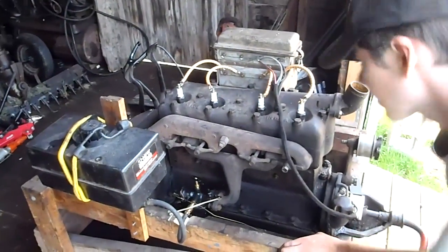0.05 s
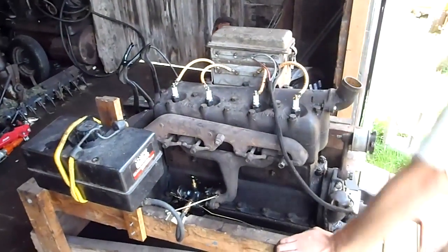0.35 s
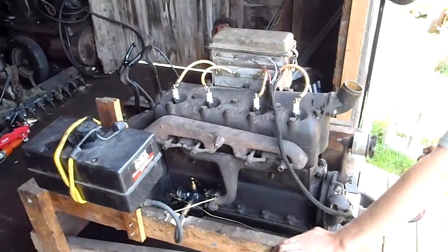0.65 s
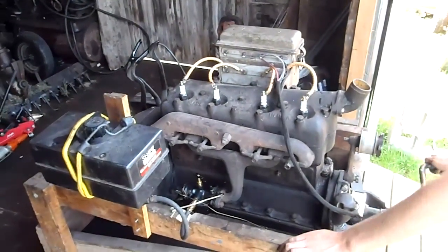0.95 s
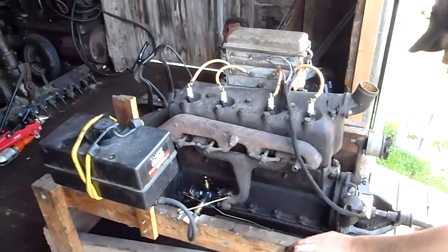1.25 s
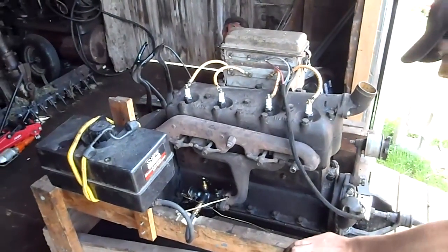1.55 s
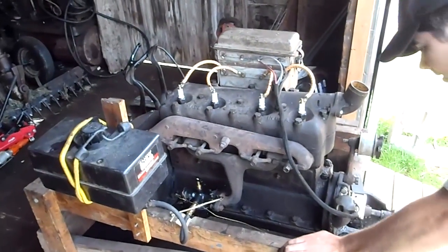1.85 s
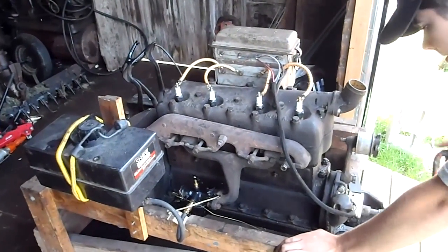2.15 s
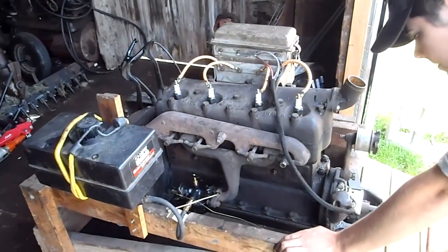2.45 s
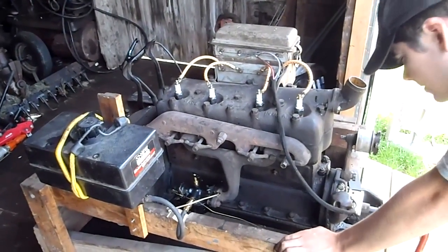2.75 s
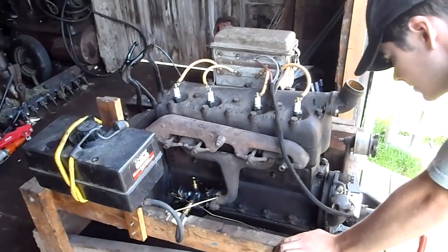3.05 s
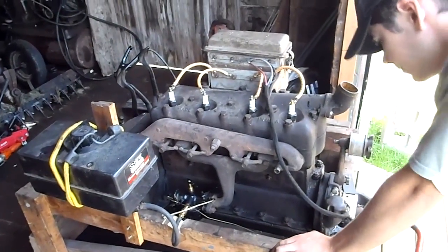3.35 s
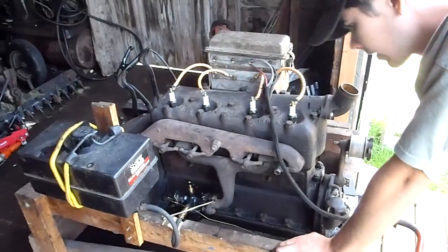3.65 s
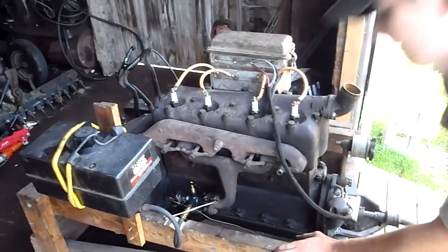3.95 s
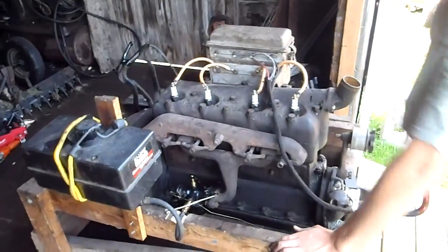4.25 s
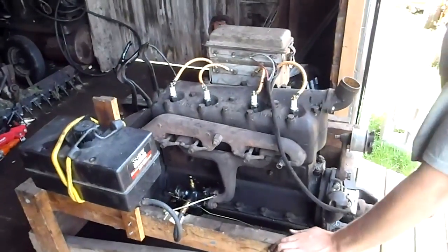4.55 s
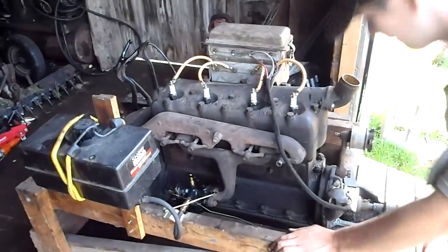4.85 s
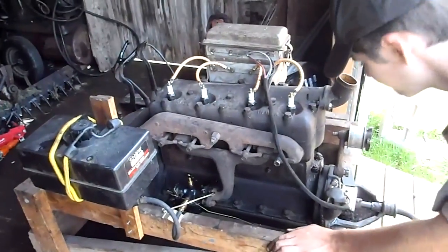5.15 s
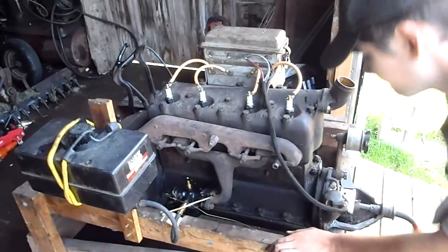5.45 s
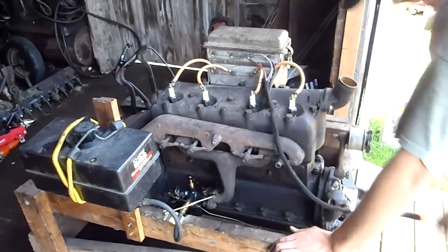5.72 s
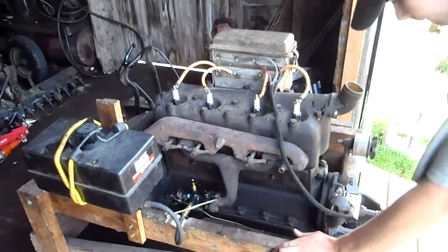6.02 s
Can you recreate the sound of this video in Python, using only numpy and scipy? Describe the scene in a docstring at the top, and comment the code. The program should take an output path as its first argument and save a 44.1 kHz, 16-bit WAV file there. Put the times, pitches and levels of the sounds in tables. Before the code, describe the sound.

An old engine is turned over by hand in a wooden shed and never starts. The steel crank clanks while ignition coils buzz, pistons scrape and squeezed air hisses out. A quieter stretch brings a few ratchet clicks and soft wooden thumps. Then a louder attempt follows, with longer buzzing, sharp ringing knocks and a brief squeak. The sounds are close, with a short echo over soft outdoor air.

```python
"""An old four-cylinder engine is cranked by hand in a wooden shed and does not start.
The steel crank clanks in its ratchet, sets the iron block and the handle ringing, and briefly squeaks.
Ignition coils buzz and spit sparks whenever the timer, a turning switch, connects one of them.
Pistons scrape, squeezed air hisses and whistles out, and the engine thumps on its timber stand.
The plank walls echo, and a soft rush of outdoor air comes in through the door."""
import sys
import numpy as np
from scipy import signal
from scipy.fft import rfft, irfft, next_fast_len
from scipy.io import wavfile

SR = 44100
rng = np.random.default_rng(int(sys.argv[2]) if len(sys.argv) > 2 else 0)


def transcribe(u):
    """Save the signal u as a 16-bit wav file named by the first command-line argument.

    u: samples, shape (n,) or (channels, n), limited to [-1, 1]; the rate is SR.
    q: integer samples, one column per channel.
    """
    v = np.clip(np.atleast_2d(u).T, -1, 1)
    q = np.round(v * 32767).astype(np.int16)
    wavfile.write(sys.argv[1], SR, q)


N = 272626
TIME = np.arange(N) / SR


def from_db(db):
    """Turn decibels into a factor to multiply a sound by."""
    return 10 ** (np.asarray(db) / 20)


def rms_one(x):
    """Scale a signal so that its average strength (rms) is 1."""
    return x / np.sqrt(np.mean(x ** 2) + 1e-20)


def fade(t, ring_s):
    """A dying away that loses 60 dB every ring_s seconds."""
    return from_db(-60 * t / ring_s)


def at_hz(points, hz):
    """Read a table between its rows, giving each octave equal room."""
    freqs, values = np.transpose(points)
    return np.interp(np.log(np.maximum(hz, 1)), np.log(freqs), values)


def coloured(x, spectrum, peaks=()):
    """Give a sound a broad tone colour with ringing peaks on top, at strength 1."""
    size = next_fast_len(len(x))
    hz = np.arange(size // 2 + 1) * SR / size
    gain = from_db(at_hz(spectrum, hz))
    for centre, width, lift_db in peaks:
        gain = gain * (1 + (from_db(lift_db) - 1) / (1 + 2j * (hz - centre) / width))
    return rms_one(irfft(rfft(x, size) * gain, size)[:len(x)])


def band(x, edges_hz, kind, order=2):
    """Keep one range of frequencies."""
    return signal.sosfilt(signal.butter(order, edges_hz, kind, fs=SR, output="sos"), x)


def drift(rate_hz):
    """A random wander of strength 1 that turns rate_hz times a second."""
    points = rng.standard_normal(4000)
    return rms_one(np.interp(TIME * rate_hz, np.arange(len(points)), points))


def surge(top_s, db, rise_s, fall_s):
    """A level that builds smoothly to its top, then dies away."""
    before, after = np.maximum(top_s - TIME, 0), np.maximum(TIME - top_s, 0)
    return from_db(db) * np.exp(-(before / rise_s) ** 2 - after / fall_s)


def add(track, start_s, sound):
    """Mix a sound into a track at the given time."""
    start = max(round(start_s * SR), 0)
    track[start:start + len(sound)] += sound[:N - start]


# tone colour of the air outside: frequency_hz, gain_db
AIR_COLOUR = [(15, -48), (25, -16.5), (168, -6), (344, -4.5), (392, -15), (525, -4), (632, -1.5), (703, -1),
              (761, 1), (868, -3), (1870, -9), (2310, -8.5), (14000, -14)]
def outdoor_air(level_db=-51):
    """A steady, soft rush comes through the open door."""
    return from_db(level_db) * coloured(rng.standard_normal(N), AIR_COLOUR)


# a piston comes up and squeezes the air: top_s, hiss_db, push_s
PISTON_STROKES = [(.35, -46, 0.043), (.55, -36.5, 0.13), (.885, -53, .035), (1.33, -46.5, 0.16),
                  (2.1, -55, 0.069), (2.8, -53.5, .15), (3.38, -56, 0.14), (3.68, -61, 0.066),
                  (3.929, -50, 0.048), (4.311, -31, 0.096), (5.29, -45, 0.11), (5.69, -32, 0.032),
                  (5.95, -41, 0.12)]
# tone colours of the scraping and of the escaping air: frequency_hz, gain_db
DRAG_COLOUR = [(60, -27.5), (150, -9), (280, 0), (480, 2), (700, -4.5), (1100, -3.5), (2000, -3.5),
               (4000, -16)]
LEAK_COLOUR = [(300, -12.5), (1500, -4.5), (3000, -3), (4300, 2), (5300, 4), (6300, 0.5), (8000, -13.5),
               (14000, -22)]
# a faint ringing in the escaping air: pitch_hz, width_hz, lift_db
LEAK_PEAK = [(5080, 100, 0.95)]
def cylinders(rest_hiss_db=-57, rest_drag_db=-53.5, drag_follows=0.22, grit_db=2):
    """Pistons scrape along and push air past their sealing rings; both sounds grow with pressure."""
    scrape = coloured(rng.standard_normal(N) * from_db(grit_db * drift(60)), DRAG_COLOUR)
    hiss = coloured(rng.standard_normal(N), LEAK_COLOUR, LEAK_PEAK)
    squeezes = sum(surge(top_s, db, push_s, fall_s=0.11) for top_s, db, push_s in PISTON_STROKES)
    pressure = from_db(rest_hiss_db) + squeezes
    drag = from_db(rest_drag_db) * (pressure / from_db(rest_hiss_db)) ** drag_follows
    return drag * scrape + pressure * hiss


# notes of the cast-iron block: pitch_hz, relative_db, ring_s
BLOCK_NOTES = [(208.7, -24.5, 0.36), (322.5, -29, 0.6), (488, -23, 0.083), (579.5, -21, 0.25),
               (666, -12.5, 0.54), (707, -15, 0.25), (1151, -17.5, 0.16)]
def knock(notes, crack_colour, thud_db, clank_db, click_db, crack_db=4, crack_s=0.058):
    """Steel hits steel: a noisy crack and ringing notes make a low thud, a clank and a high click."""
    t = np.arange(SR * 3 // 4) / SR
    ring = from_db(crack_db) * fade(t, crack_s) * coloured(rng.standard_normal(len(t)), crack_colour)
    for hz, db, ring_s in notes + list(BLOCK_NOTES):
        strength = from_db(db + 3 * rng.standard_normal()) * rng.choice([-1, 1])
        shifted_hz = hz * (1 + 0.0061 * rng.standard_normal())   # the hand's push bends each note
        ring += strength * fade(t, ring_s) * np.sin(2 * np.pi * shifted_hz * t)
    get_moving = 1 - np.exp(-t / 0.00053)   # the heavy block needs a moment
    thud = band(ring, [170, 1200], "band", order=3) * get_moving
    clank = band(ring, [1400, 3300], "band", order=3)
    click = band(ring, 3300, "high", order=3)
    parts = (thud_db, thud), (clank_db, clank), (click_db, click)
    return sum(from_db(db) * part / np.std(part[t < .01]) for db, part in parts)


# notes of the steel crank and ratchet: pitch_hz, in_knock_db, in_slip_db, ring_s
CRANK_NOTES = [(476, -3, -5, .08), (560, -11, -6, .12), (780, -6, -13, .04), (960, -9, -9, .04),
               (1270, -12, -20, .04), (1640, -4, -9, .06), (1707, -11, -12, .12), (1865, -9, 4, .06),
               (1968, -20, -12, .13), (2920, -15, -9, .04), (3230, -11, -6, .04), (3590, -13, -5, .06),
               (4200, -11, -5, .04), (4860, -14, 0, .07), (5040, -16, -8, .11), (5260, 1, -11, .035),
               (6200, -8, -10, .05), (7100, -17, -14, .025), (2500, -15, 2, .028)]
# the crank's pin knocks in its seat: start_s, relative_db, hardness_db
PIN_KNOCKS = [(0.2886, -29.5, -9.5), (0.3487, -17.5, 1.5), (0.4617, -25.5, -5), (0.5483, -23, -16),
              (0.5886, -26.5, -30), (0.606, -19, 1), (0.6988, -32.5, -1), (0.9828, -33.5, 8.5),
              (1.041, -32, -2.5), (1.2131, -33, -12), (1.503, -40, -9), (1.6814, -43, -15),
              (2.2775, -33, -11), (3.1103, -29, -20), (3.25, -37, -16), (3.9947, -30, -12),
              (4.0541, -27, -6), (4.0795, -14, 0.5), (4.1405, -25, 2), (4.2115, -23, -2.5),
              (4.4199, -31, -21), (4.4608, -27, -2), (4.6019, -25.5, 7.5), (4.6292, -14.5, -2.5),
              (4.6459, -19.5, 3), (4.9714, -21, -7), (5.0409, -11, -2), (5.0484, -24.5, 8),
              (5.1472, -21, 3), (5.251, -19.5, -20), (5.2691, -20.5, 5), (5.654, -13.5, 1),
              (5.8297, -28, -5), (5.8673, -22.5, 1), (6.0629, -20, -3.5)]
# the pin rides over a ratchet tooth and drops: start_s, clank_db, thud_db, click_db
PIN_SLIPS = [(2.052, -43, -50, -45.5), (2.207, -41.5, -41, -41.5), (2.455, -23.5, -38.5, -28),
             (2.471, -31.5, -43, -35.5), (2.6899, -16, -46, -19), (2.7008, -22, -30.5, -27.5)]
# tone colours of the crack in a knock and in a slip: frequency_hz, gain_db
KNOCK_COLOUR = [(100, -2), (250, -33), (480, -3.5), (850, 18.5), (1150, 11), (1650, 7.5), (2200, 9),
                (3200, 7), (4400, 6.5), (5300, 11), (7500, 0.5), (8800, -10.5), (15000, -41)]
SLIP_COLOUR = [(150, -8), (520, 1), (900, 4.5), (1350, -2), (1850, -3), (2150, -6), (2500, 11), (3200, -8),
               (4900, 2), (5600, -9), (7700, -8), (8800, -35), (15000, -22)]
def crank(bounce_s=0.016, bounce_db=-17.5):
    """The pin knocks and bounces once, or slips off a tooth. Harder knocks click more and thud less."""
    knock_notes = [(hz, db, ring_s) for hz, db, _, ring_s in CRANK_NOTES]
    slip_notes = [(hz, db, ring_s) for hz, _, db, ring_s in CRANK_NOTES]
    out = np.zeros(N)
    for start_s, db, hardness_db in PIN_KNOCKS:
        thud_db = -41 + 0.78 * (db + 25) - 0.41 * hardness_db   # -25 is a middling knock
        levels_db = thud_db - 3, db - 9, db + hardness_db - 7   # thud, clank, click
        add(out, start_s, knock(knock_notes, KNOCK_COLOUR, *levels_db))
        again_s = start_s + bounce_s * rng.uniform(0.87, 1.2)
        add(out, again_s, from_db(bounce_db) * knock(knock_notes, KNOCK_COLOUR, *levels_db))
    for start_s, clank_db, thud_db, click_db in PIN_SLIPS:
        slip = knock(slip_notes, SLIP_COLOUR, thud_db, clank_db, click_db, crack_db=8, crack_s=0.038)
        add(out, start_s, slip)
    return out


# the timer connects a coil: start_s, length_s, level_db, midway_change_db, coil_name
TIMER_CONTACTS = [(0.33, 0.0086, -35, 3, "A"), (0.387, 0.2, -33.5, 9, "A"), (0.977, 0.017, -32.5, -2, "A"),
                  (1.067, 0.35, -33, 1.5, "B"), (3.858, 0.032, -33.5, 2, "A"),
                  (4.097, 0.07, -37.5, 5.5, "A"), (4.248, 1.445, -30, -0.5, "C"),
                  (5.859, .19, -29.5, 0, "B"), (5.905, 0.11, -30, 1.5, "A"), (6.124, 0.078, -27, -3.5, "B")]
def timer(name, attack_s=0.005, release_s=0.0026):
    """One coil's loudness: on as the switch closes, swelling or dipping midway, off as it opens."""
    gain = np.zeros(N)
    for start_s, length_s, db, change_db, coil_name in TIMER_CONTACTS:
        if coil_name == name:
            t = TIME - start_s
            arch = np.sin(np.pi * np.clip(t / length_s, 0, 1))
            attack = np.clip(t / attack_s, 0, 1)
            release = np.exp(-np.maximum(t - length_s, 0) / release_s)
            gain += from_db(db + change_db * arch) * attack * release
    return gain


# tone colour of the sparks: frequency_hz, gain_db
SPARK_COLOUR = [(80, -41), (300, -25), (700, -18), (1800, -13), (2800, -12.5), (3800, -1.5), (5200, 1.5),
                (6200, 1.5), (7300, -6), (8800, -14), (11500, -11.5), (14000, -13.5)]
# ringing of each coil's steel spring and case: pitch_hz, width_hz, lift_db
COIL_A_PEAKS = [(705, 150, 16.5), (2490, 510, 12.5), (3750, 120, 0.5), (4040, 72, 10.5), (5130, 420, 7),
                (5680, 120, 2.5), (10600, 710, -1)]
COIL_B_PEAKS = [(45, 48, 24.4), (674, 130, 1.6), (1094, 40, 14.3), (2280, 150, 10.3), (3620, 49, 12.6),
                (4930, 170, 1.5), (5390, 930, 6.8), (7380, 300, 7.9), (8540, 140, 11.5), (11100, 70, 13.3)]
COIL_C_PEAKS = [(1093, 40, 9.9), (2430, 190, 10.1), (4300, 70, 8.2), (5840, 72, 9.3), (6370, 40, 7.6),
                (6206, 80, 5.6), (10680, 210, 9.4), (11270, 187, 13), (13500, 1400, 1.6)]
def coil(peaks, buzz_hz, jitter=0.1, spark_s=0.0012, sizzle=0.96, uneven_db=2.2, flutter_db=1.2):
    """A trembling spring keeps breaking the current; each break sparks and rings spring and case."""
    cycles = np.cumsum(buzz_hz * np.exp(jitter * drift(150))) / SR
    strength = from_db(uneven_db * rng.standard_normal(N))[cycles.astype(int)]
    since_break_s = (cycles % 1) / buzz_hz
    sparks = strength * np.exp(-since_break_s / spark_s) + sizzle
    buzz = sparks * from_db(flutter_db * drift(90)) * rng.standard_normal(N)
    # the coil's box adds many short-lived notes
    t = np.arange(SR // 16) / SR
    box = rng.standard_normal(len(t)) * fade(t, ring_s=0.086)
    box_ring = from_db(-7) * signal.fftconvolve(buzz, box / np.linalg.norm(box))[:N]
    return coloured(buzz + box_ring, SPARK_COLOUR, peaks)


# the engine rocks its stand: start_s, level_db, pitch_hz
STAND_THUMPS = [(0.342, -40, 200), (.59, -40, 590), (.618, -35, 583), (.635, -42, 290), (1.041, -42.5, 328),
                (1.051, -49, 195), (1.271, -42, 420), (2.069, -42, 465), (2.304, -45, 486),
                (2.715, -36, 570), (3.112, -38, 490), (3.266, -41, 280), (4.647, -33.5, 640),
                (5.048, -27, 485), (5.153, -38, 380), (5.272, -37.5, 360), (5.976, -39.5, 312),
                (6.064, -36, 610)]
# tone colour of the timber: frequency_hz, gain_db
TIMBER_COLOUR = [(70, -58), (150, -7.5), (290, 0.5), (500, 2.5), (800, 8), (1500, -3.5), (4000, -26)]
def stand(rise_s=0.0011, ring_s=0.1, width_hz=50, lift_db=15):
    """Wood thumps softly as the engine's weight shifts from one beam to another."""
    t = np.arange(SR // 3) / SR
    shape = (1 - np.exp(-t / rise_s)) * fade(t, ring_s)
    out = np.zeros(N)
    for start_s, db, pitch_hz in STAND_THUMPS:
        wood = coloured(rng.standard_normal(len(t)), TIMBER_COLOUR, [(pitch_hz, width_hz, lift_db)])
        thump = shape * wood
        add(out, start_s, from_db(db) * thump / np.std(thump[:SR // 50]))
    return out


# the handle is jolted: start_s, peak_db
HANDLE_JOLTS = [(0.606, -18.5), (1.94, -37.5), (2.278, -27), (4.973, -17.5), (5.0407, -8.5), (5.057, -21),
                (5.073, -31), (6.062, -19.5)]
# notes of the bending handle: pitch_hz, relative_db, ring_s
HANDLE_NOTES = [(1545, -7, .04), (1625, 0, .06), (1707, -4, .08)]
def handle():
    """A jolt bends the long handle, which rings with a short metallic note."""
    t = np.arange(SR // 3) / SR
    note = sum(from_db(db) * fade(t, ring_s) * np.sin(2 * np.pi * hz * t)
               for hz, db, ring_s in HANDLE_NOTES)
    note = band(note, 1400, "high", order=3)   # only the ringing is kept, with no low thump beneath it
    out = np.zeros(N)
    for start_s, db in HANDLE_JOLTS:
        add(out, start_s, from_db(db) * note / np.abs(note).max())
    return out


# the valve whistles: top_s, level_db
VALVE_WHISTLES = [(.69, -43.5), (1.45, -55), (3.28, -59), (5.73, -40.5)]
# tone colour of the whistle: frequency_hz, gain_db
WHISTLE_COLOUR = [(3000, -60), (4500, -30), (4730, 7), (4950, -4), (5400, -22), (8000, -60)]
def valve():
    """Air slips through a leaking valve with a thin whistle after some strokes."""
    gain = sum(surge(top_s, db, rise_s=0.03, fall_s=0.18) for top_s, db in VALVE_WHISTLES)
    return gain * coloured(rng.standard_normal(N), WHISTLE_COLOUR)


# two quick chirps of one squeak: start_s, length_s, pitch_hz, overtone_db, base_vs_overtone_db
SQUEAK_CHIRPS = [(4.613, 0.023, 1552, -13, -14), (4.642, 0.022, 1564, -22.5, -27)]
def squeak(pitch_fall=0.07):
    """The dry crank sticks and slips in its bearing, and rings along at three times the pitch."""
    out = np.zeros(N)
    for start_s, length_s, pitch_hz, db, base_db in SQUEAK_CHIRPS:
        progress = np.linspace(0, 1, round(length_s * SR))
        falling_hz = pitch_hz * (1 + pitch_fall * (.5 - progress))
        phase = 2 * np.pi * np.cumsum(falling_hz) / SR
        tone = np.sin(3 * phase) + from_db(base_db) * np.sin(phase)
        add(out, start_s, from_db(db) * np.sin(np.pi * progress) * tone)
    return out


# how long the shed echoes: frequency_hz, ring_s
ECHO_TIMES = [(150, 0.34), (600, 0.46), (2000, 0.22), (5000, 0.3), (8000, 0.13), (14000, 0.31)]
def shed(x, first_echo_s=0.0084, build_s=0.0085):
    """Plank walls and clutter throw back a blur of echoes; the low middle notes last longest."""
    t = np.arange(SR * 3 // 4) / SR
    noises = rng.standard_normal((2, len(t)))
    edges_hz = np.geomspace(80, 16000, 10)
    echoes = np.zeros(len(t))
    for k, (low, high) in enumerate(zip(edges_hz, edges_hz[1:])):
        ring_s = at_hz(ECHO_TIMES, np.sqrt(low * high))
        echoes += band(noises[k % 2], [low, high], "band") * fade(t, ring_s)
    echoes *= np.clip((t - first_echo_s) / build_s, 0, 1)
    return signal.fftconvolve(x, echoes / np.linalg.norm(echoes))[:N]


def scene():
    """Mix the engine and the outdoor air into one channel; only the clatter and the coils echo."""
    clatter = crank() + handle() + squeak() + stand()
    coils = (timer("A") * coil(COIL_A_PEAKS, buzz_hz=169.0)
             + timer("B") * coil(COIL_B_PEAKS, buzz_hz=253.4)
             + timer("C") * coil(COIL_C_PEAKS, buzz_hz=286.0))
    air = outdoor_air()
    echoes = shed(from_db(-12) * clatter + from_db(-12.5) * coils)
    return (air + cylinders() + clatter + coils + valve() + echoes)[None]


def record(dry, cutoff_hz=14200):
    """Cut off the very highest treble steeply."""
    return signal.sosfilt(signal.ellip(16, .1, 70, cutoff_hz, fs=SR, output="sos"), dry)


dry = scene()
out = record(dry)
transcribe(out)
```